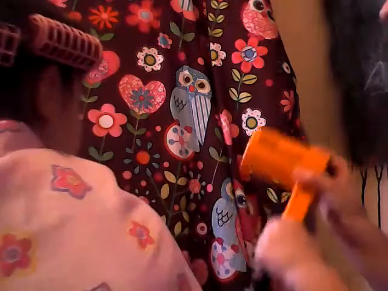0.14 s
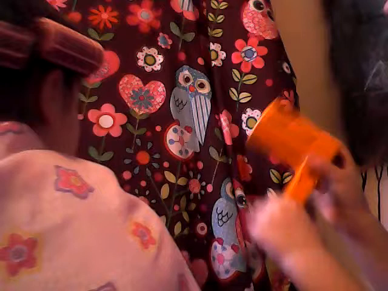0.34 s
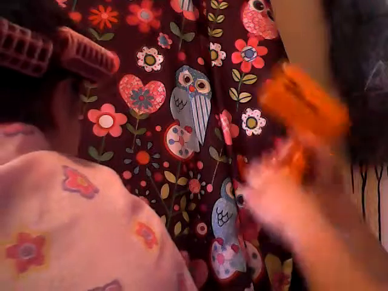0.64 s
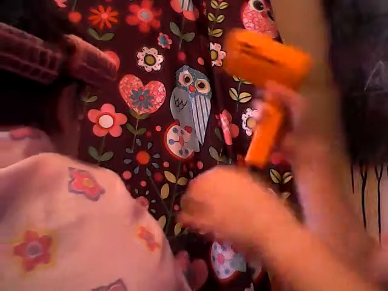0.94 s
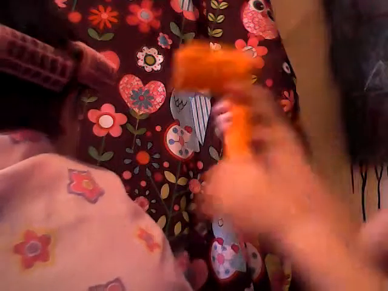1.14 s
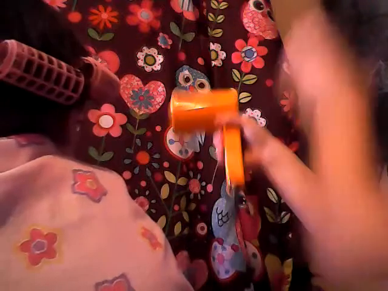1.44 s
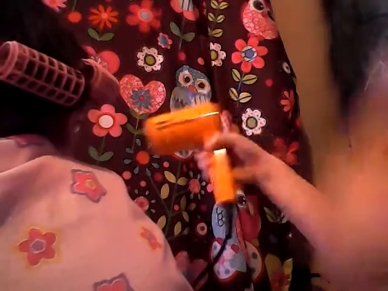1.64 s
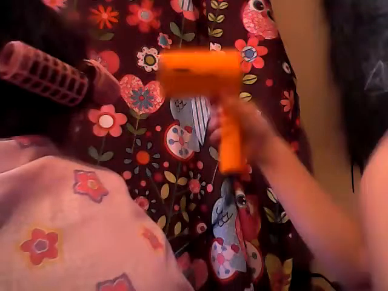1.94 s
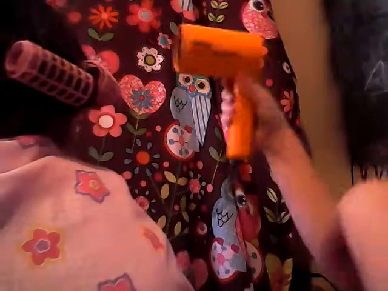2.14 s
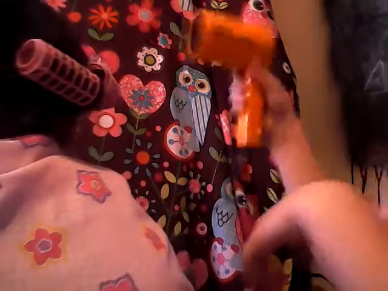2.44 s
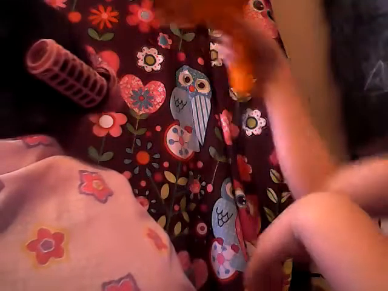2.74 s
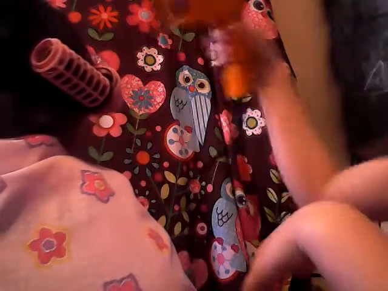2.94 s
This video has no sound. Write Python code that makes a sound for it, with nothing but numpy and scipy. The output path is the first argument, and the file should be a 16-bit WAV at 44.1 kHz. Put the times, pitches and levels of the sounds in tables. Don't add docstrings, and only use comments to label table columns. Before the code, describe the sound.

A small hair dryer whines up to speed, then blows steadily while waved about a bedroom.

```python
import sys
import numpy as np
from scipy import signal
from scipy.fft import rfft, irfft, next_fast_len
from scipy.io import wavfile
from scipy.ndimage import uniform_filter1d, map_coordinates

SR = 44100
rng = np.random.default_rng(int(sys.argv[2]) if len(sys.argv) > 2 else 0)


def transcribe(u):
    v = np.clip(np.atleast_2d(u).T, -1, 1)
    q = np.round(v * 32767).astype(np.int16)
    wavfile.write(sys.argv[1], SR, q)


def amplitude_ratio(level_db):
    exponent = np.asarray(level_db, float) / 20
    return 10 ** exponent


N = 136710
TIME = np.arange(N) / SR
BLADES = 7


def unit(x):
    return x / np.sqrt(np.mean(x ** 2) + 1e-20)


def curves(rows):
    seconds, *columns = np.transpose(rows)
    return [np.interp(TIME, seconds, column) for column in columns]


def wobble(rate):
    return map_coordinates(rng.standard_normal(200), [np.clip(TIME * rate, 0, 198)])


def filtered(x, response):
    size = next_fast_len(N + SR // 2)
    return irfft(rfft(x, size) * response(np.fft.rfftfreq(size, 1 / SR)), size)[..., :N]


def smooth_field(shape, bins, steps):
    field = uniform_filter1d(rng.standard_normal(shape), size=bins, axis=0)
    return unit(uniform_filter1d(field, size=steps, axis=1))


def noise(spectrum, patchy_db, drift_db=0):
    z = signal.stft(rng.standard_normal(N), nperseg=512)[2]
    patches_db = patchy_db * smooth_field(z.shape, bins=6, steps=10)
    drifts_db = drift_db * smooth_field(z.shape, bins=18, steps=50)
    x = signal.istft(z * amplitude_ratio(patches_db + drifts_db), nperseg=512)[1][:N]
    f, db = np.transpose([(10, -120), *spectrum, (22000, -120)])
    return unit(filtered(x, lambda hz: amplitude_ratio(np.interp(np.log(hz + 1), np.log(f + 1), db))))


# time in seconds, blade passing rate in Hz.
SPEED = [(0, 1160), (.05, 1400), (.1, 1565), (.15, 1695), (.2, 1798), (.26, 1886), (.33, 1947), (.42, 1984),
         (.55, 2001), (.78, 2007), (.95, 1997), (1.2, 2000), (1.55, 2006), (1.8, 2006), (2.1, 2002),
         (2.5, 2003), (2.8, 2007), (3.1, 2006)]


def spin():
    rate_hz = curves(SPEED)[0]
    waver_hz = 2.2 * wobble(14)
    return rate_hz, np.cumsum(rate_hz + waver_hz) / SR / BLADES


def tone(order, turns, share, rate):
    steady = np.sqrt(1 - min(share, 1) ** 2)
    shifting = share * (wobble(rate) + 1j * wobble(rate)) / np.sqrt(2)
    carrier = np.exp(2j * np.pi * (order * turns + rng.random()))
    return np.sqrt(2) * np.real((steady + shifting) * carrier)


# time in seconds, level in dB of the blade tone, then of its 2nd, 3rd, 4th and 5th overtone.
TURN = [(0, -42, -44, -55, -49, -46), (0.12, -45, -63, -57, -64, -62), (0.26, -37, -53, -50, -52, -50),
        (0.35, -39, -44, -50, -63, -55), (0.4, -43, -50, -45, -45, -51), (0.46, -41, -44, -44, -43, -52),
        (0.52, -49, -44, -43, -43, -48), (0.62, -57, -47, -43, -51, -55), (0.72, -45, -50, -49, -41, -52),
        (0.8, -45, -52, -41, -43, -53), (0.88, -46, -52, -43, -47, -54), (0.98, -44, -42, -47, -50, -48),
        (1.07, -55, -43, -51, -45, -59), (1.14, -68, -53, -52, -47, -56), (1.22, -49, -53, -47, -42, -54),
        (1.34, -56, -54, -44, -55, -55), (1.46, -51, -49, -55, -51, -62), (1.57, -60, -51, -48, -42, -63),
        (1.68, -45, -55, -54, -48, -51), (1.78, -45, -53, -46, -42, -47), (1.88, -50, -55, -41, -48, -51),
        (1.98, -47, -48, -47, -44, -49), (2.07, -47, -43, -47, -42, -55), (2.16, -47, -62, -50, -39, -47),
        (2.25, -48, -51, -43, -42, -58), (2.35, -56, -50, -43, -44, -48), (2.45, -46, -47, -45, -42, -51),
        (2.55, -51, -45, -46, -46, -52), (2.64, -55, -44, -44, -42, -56), (2.72, -50, -51, -47, -52, -56),
        (2.84, -47, -45, -48, -45, -54), (2.95, -57, -49, -54, -45, -58), (3.07, -45, -44, -44, -47, -50)]
# multiple of the blade rate, the one whose swells it follows,
# level over that in dB, unsteady share (0 to 1).
OVERTONES = [(1, 1, -.5, .3), (2, 2, 1.5, .5), (3, 3, 0, .6), (4, 4, 1, .65), (5, 5, 1, .65),
             (6, 4, -18, .5)]
# multiple of the shaft rate, level in dB, unsteady share (0 to 1).
SHAFT = [(1, -62, .4), (2, -74, .5), (4, -46, .75), (5, -55.5, .75), (8, -67, .6), (29, -63, .8),
         (30, -54, .8)]
# time in seconds, gain in dB.
GRIP = [(0, -3), (.2, 2), (.55, 7.5), (.75, -7), (.9, 5.5), (1.5, -1), (1.75, -9), (2.2, -4.5), (2.45, -3),
        (2.7, 8.5), (2.92, 0.5), (3.1, 4.5)]


def whine(turns, speed_db):
    blade_db, grip_db = curves(TURN), curves(GRIP)[0]
    x = 0
    for k, follows, db, share in OVERTONES:
        bite_db = 3.5 * speed_db * (k > 1)
        level = amplitude_ratio(db + blade_db[follows - 1] + bite_db)
        x = x + level * tone(BLADES * k, turns, share, rate=45)
    for k, db, share in SHAFT:
        growth_db = 9 * min(k / 4, 1) * speed_db
        shake_db = grip_db * (k < 3) + 1.1 * wobble(3.83)
        x = x + amplitude_ratio(db + growth_db + shake_db) * tone(round(k), turns, share, rate=18)
    return x


def room(x):
    room_db, t60_s = -11, .2
    t = TIME[:SR // 3]
    tail = rng.standard_normal(len(t)) * amplitude_ratio(-60 * t / t60_s) * (t > .004)
    return x + amplitude_ratio(room_db) * signal.fftconvolve(x, tail / np.linalg.norm(tail))[:N]


# frequency in Hz, level in dB per Hz.
RUSH = [(1240, -25), (2100, -9.5), (3500, -6.5), (4030, -2.5), (4900, -8), (5820, -2.5), (8290, 0.5),
        (12200, -7), (13700, -15.5)]
# frequency in Hz, half width in Hz, gain in dB.
GRILLE = [(2340, 180, 0.5), (3600, 160, -2.5), (4300, 330, -1.5), (5050, 520, 4), (6300, 500, -1),
          (8770, 420, 2.5), (11280, 1500, -5)]


def air_rush(turns, facing_db):
    chop = 1 + .03 * np.sin(4 * np.pi * turns)
    rush = chop * noise(RUSH, patchy_db=1.0, drift_db=0.97)
    rush = filtered(rush, lambda f: amplitude_ratio(sum(db / (1 + ((f - hz) / width) ** 2) for hz, width, db in GRILLE)))
    high = filtered(rush, lambda hz: 1 / (1 + (6300 / (hz + 1)) ** 4))
    gusts_db = 0.95 * wobble(6.18) + 0.29 * wobble(22)
    return amplitude_ratio(gusts_db) * (amplitude_ratio(facing_db) * high + amplitude_ratio(-facing_db) * (rush - high))


# frequency in Hz, width in Hz, level in dB.
BARREL = [(992.5, 144, -8.5), (1125, 136, 0), (1248, 118, 1), (1459, 70, -10)]


def barrel_hum(tuning):
    hum = 0
    for hz, width, db in BARREL:
        band = filtered(rng.standard_normal((2, N)), lambda f: 1 / (1 + (2 * f / width) ** 2))
        phase = 2 * np.pi * np.cumsum(hz * tuning) / SR
        flutter_db = 1.6 * wobble(14)
        hum = hum + amplitude_ratio(db + flutter_db) * unit(band[0] * np.cos(phase) + band[1] * np.sin(phase))
    return unit(hum)


# (added above 6300 Hz, taken off below).
HAND = [(0, -47.5, 2, 0.87, -3), (.07, -41.5, 0.5, 0.97, -2), (.15, -37.5, 0, 0.97, -1.5),
        (.3, -33.5, 2, 0.93, -2.5), (.45, -32.5, -0.5, 1.005, -3.5), (.65, -32.5, -3.5, 1.036, 0),
        (.9, -34, 0.5, 0.96, -2.5), (1.1, -34, 3, 0.96, -3), (1.25, -34.5, 0, 1.01, -2.5),
        (1.45, -35, -2.5, 1.04, -0.5), (1.7, -35.5, 0.5, 1.02, -1), (1.9, -35.5, 2.5, 1, -1.5),
        (2.15, -33.5, 1, 1, -2.5), (2.4, -33, 1.5, 0.98, -2.5), (2.65, -34, 5, 0.96, -3.5),
        (2.72, -35, -2, 1, -1.5), (2.9, -34.5, 2, .99, -2.7), (3.1, -34, -1.5, 0.99, -1)]
# frequency in Hz, level in dB per Hz.
BODY = [(90, -57), (170, -23), (260, -18.5), (500, -9.5), (900, -1.5), (1500, -7.5), (2000, -7),
        (2600, -90)]


def air(turns):
    rush_db, barrel_db, tuning, facing_db = curves(HAND)
    rush = air_rush(turns, facing_db)
    body = amplitude_ratio(-7.5 + 0.12 * barrel_db) * noise(BODY, patchy_db=1.08, drift_db=1.9)
    barrel = amplitude_ratio(-3.5 + barrel_db) * barrel_hum(tuning)
    return amplitude_ratio(rush_db) * (rush + body + barrel)


def dryer():
    low_cut_hz, low_cut_order = 185, 9
    rate_hz, turns = spin()
    speed_db = 20 * np.log10(rate_hz / rate_hz[-1])
    x = room(whine(turns, speed_db)) + air(turns)
    return filtered(x, lambda hz: 1 / (1 + (low_cut_hz / (hz + 1)) ** low_cut_order))


def room_floor():
    return amplitude_ratio(-86) * noise([(20, 16), (60, 6), (100, -8), (200, -30)], patchy_db=2.5)


# time in seconds, peak in dB, hardness (rumble over ring) in dB.
KNOCKS = [(.27, -68, 5), (.37, -76, 0), (.95, -65, -2), (1.42, -76, -2), (1.93, -63, 2), (2.1, -70, 1),
          (2.33, -68, 4), (2.674, -38, 8), (2.806, -50, 2), (2.86, -60, -3), (2.948, -31, 6),
          (3.03, -49, -2)]
# frequency in Hz, level in dB, 60 dB decay in seconds, delay in seconds.
PANEL = [(184.6, 5, 0.076, 0.0021), (128, -0.5, 0.11, 0.0267), (93, -6, 0.087, 0.01317),
         (208, -7.5, 0.16, 0.028), (155, -10, 0.17, 0.06)]
# frequency in Hz, level in dB per Hz.
THUD = [(60, -26), (120, -6), (280, -15), (450, -9), (650, -3), (900, -7), (1250, -30)]


def knocks():
    thud_db, thud_t60_s, knock_db = -6, .35, -1
    x, t = np.zeros(N + SR), TIME[:SR // 2]
    rumble = noise(THUD, patchy_db=2.5)
    for i, (s, db, hard_db) in enumerate(KNOCKS):
        onset = 1 - np.exp(-t / 0.0081)
        stretch = rumble[i * 9000:][:len(t)]
        blow = amplitude_ratio(thud_db + hard_db - 60 * t / thud_t60_s) * onset * stretch
        for hz, level, t60, late_s in PANEL:
            u = np.maximum(t - late_s, 0)
            ring = np.sin(2 * np.pi * hz * u) * (1 - np.exp(-u / 0.0055))
            blow = blow + amplitude_ratio(level - 60 * u / t60) * ring
        x[round(s * SR):][:len(t)] += amplitude_ratio(db + knock_db) * blow
    return x[:N]


def scene():
    x = dryer() + knocks() + room_floor()
    return np.array([x, x])


# frequency in Hz, threshold over the local level in dB.
GATE = [(150, -30), (1900, -20), (2250, -7), (3200, -10), (3600, -5), (4000, -18), (9500, -14), (12800, -1)]


def gate(x):
    scatter_db, top_hz, top_scatter_hz = 5, 13600, 300
    hz, _, z = signal.stft(x, SR, window="cosine", nperseg=2048)
    local = uniform_filter1d(uniform_filter1d(abs(z), size=48, axis=0), size=5, axis=1)
    f, db = np.transpose(GATE)
    bands = rng.standard_normal((len(hz) // 12 + 1, z.shape[1]))
    bands = np.repeat(bands, 12, axis=0)[:len(hz)]
    bands = unit(uniform_filter1d(bands, size=2, axis=1))
    threshold = local * amplitude_ratio(np.interp(hz, f, db)[:, None] + scatter_db * bands)
    edge_hz = top_hz + top_scatter_hz * rng.standard_normal(z.shape[1])
    kept = z * (abs(z) > threshold) * (hz[:, None] < edge_hz)
    return signal.istft(kept, SR, window="cosine", nperseg=2048)[1][:N]


# centre in seconds, lowest Hz, highest Hz, level in dB.
SPLITS = [(1.505, 6900, 8200, -43), (2.06, 5140, 6300, -41), (2.712, 5180, 6300, -44),
          (2.712, 8870, 10400, -44), (1.505, 13100, 13810, -61), (2.06, 12910, 14200, -66)]


def channel_splits():
    length_s = 0.037
    side = 0
    for s, low_hz, high_hz, db in SPLITS:
        swell = np.cos(np.pi * np.clip((TIME - s) / length_s, -.5, .5))
        band = filtered(rng.standard_normal(N), lambda hz: (hz > low_hz) & (hz < high_hz))
        side = side + amplitude_ratio(db) * swell * unit(band)
    return side * [[1], [-1]]


def band_limit(x):
    return signal.sosfilt(signal.butter(12, 13840, fs=SR, output="sos"), x)


def record(dry):
    offset = .0008
    mix = gate(dry[0]) + offset + channel_splits()
    return band_limit(mix)


dry = scene()
out = record(dry)
transcribe(out)
```